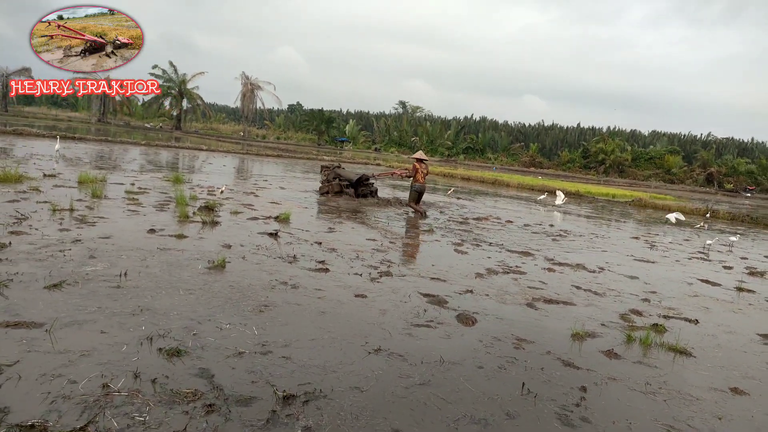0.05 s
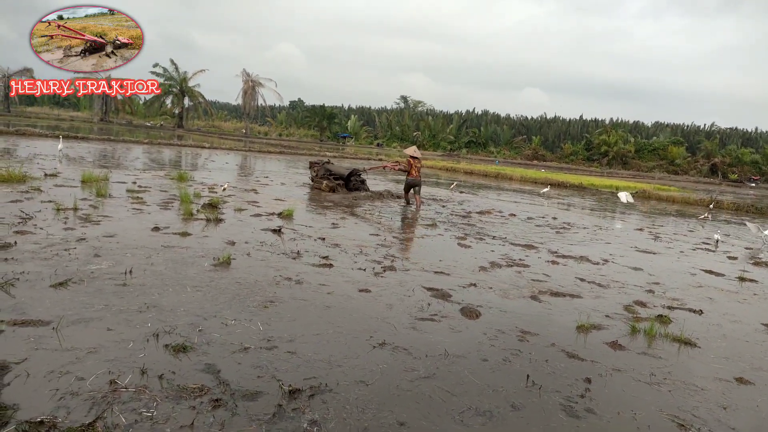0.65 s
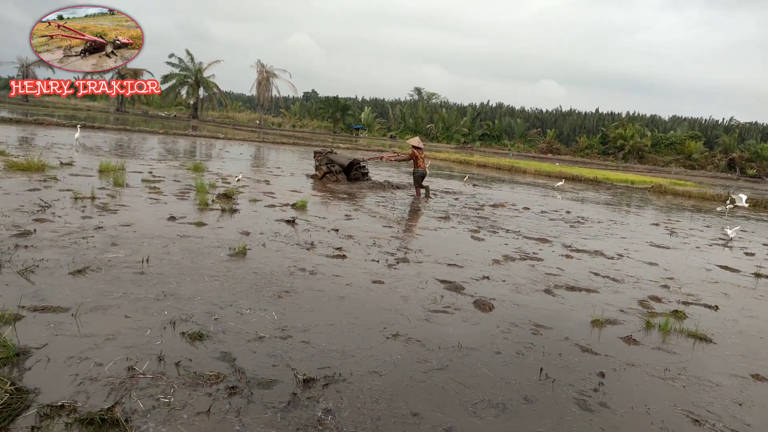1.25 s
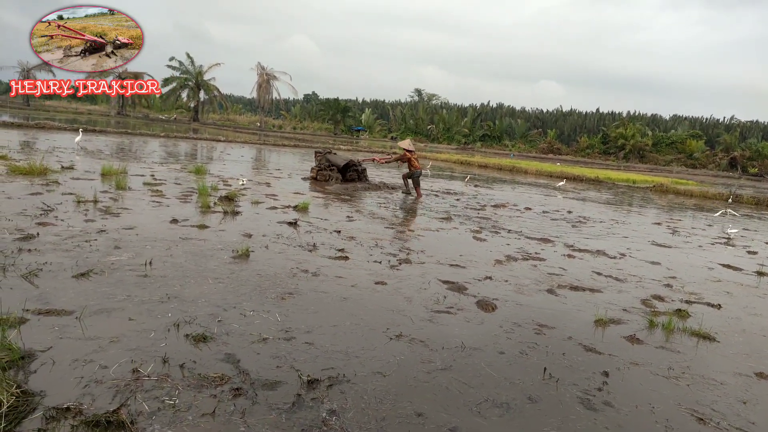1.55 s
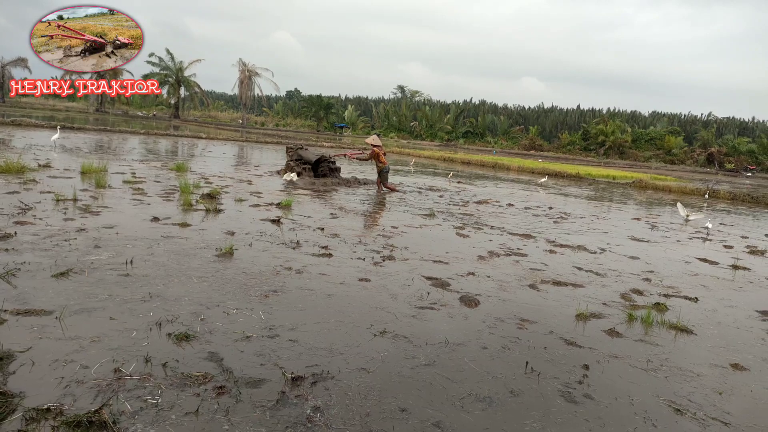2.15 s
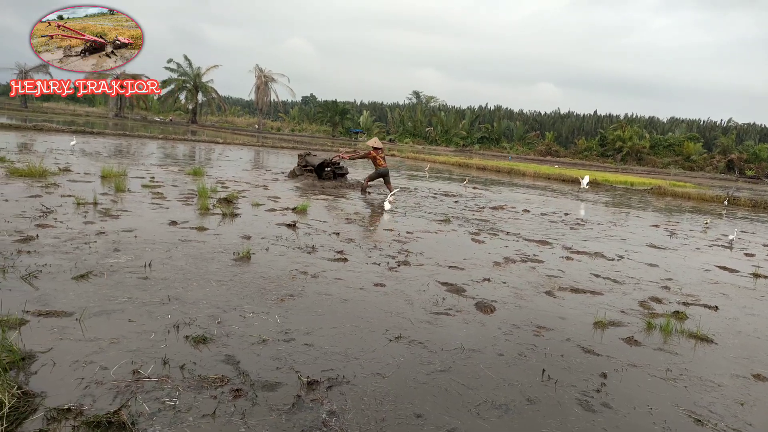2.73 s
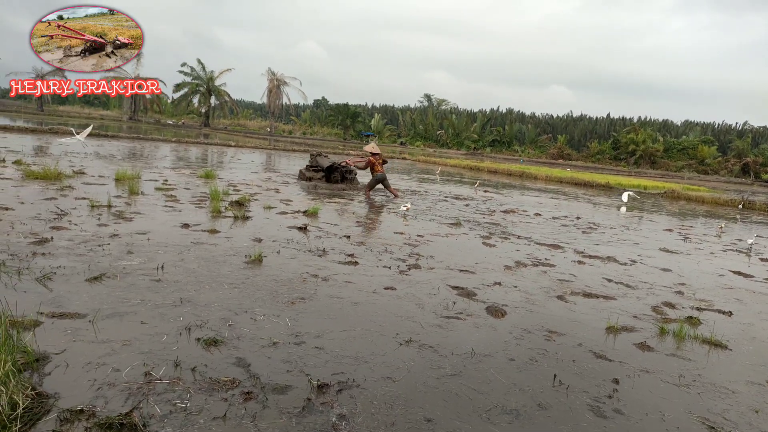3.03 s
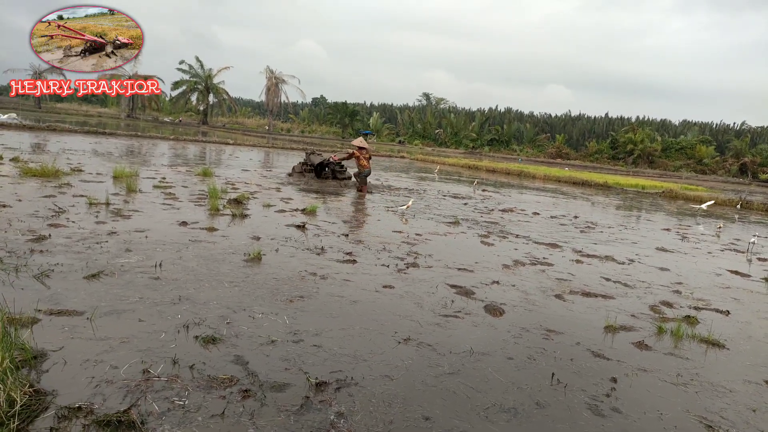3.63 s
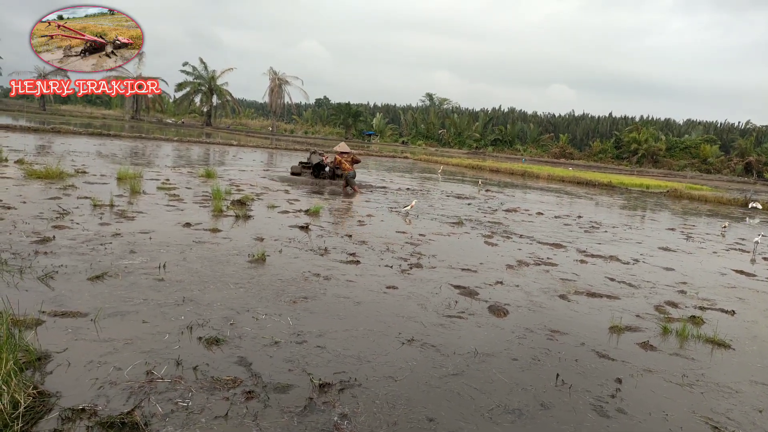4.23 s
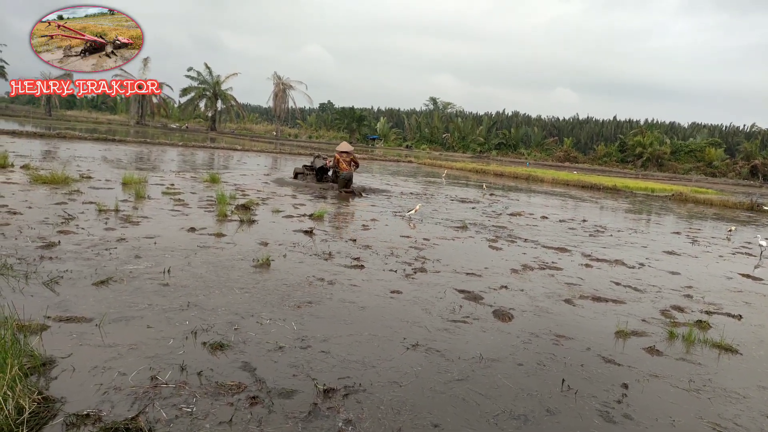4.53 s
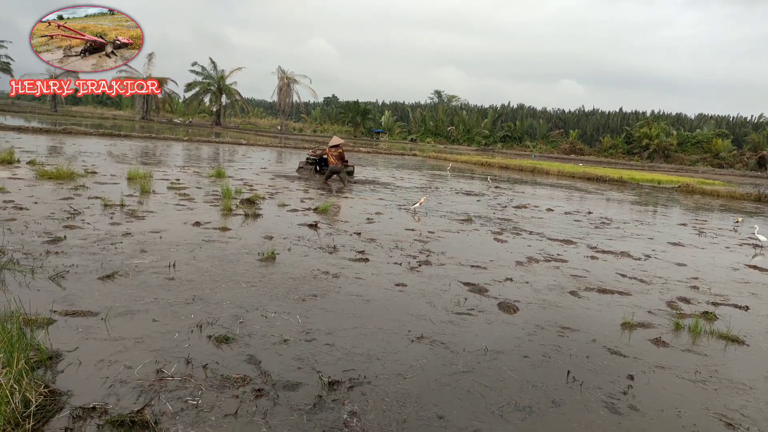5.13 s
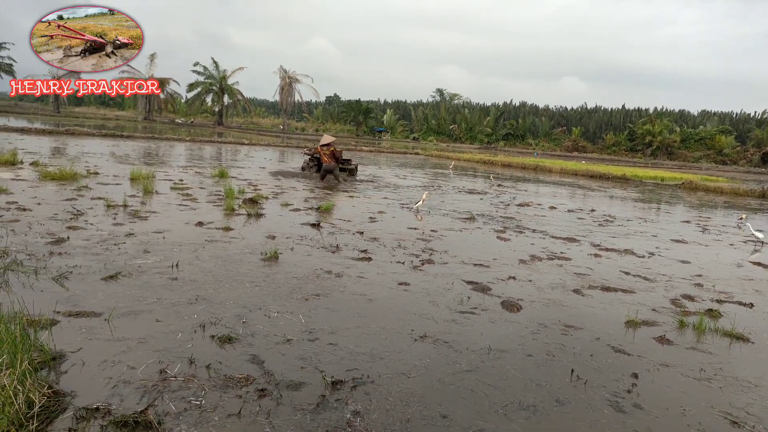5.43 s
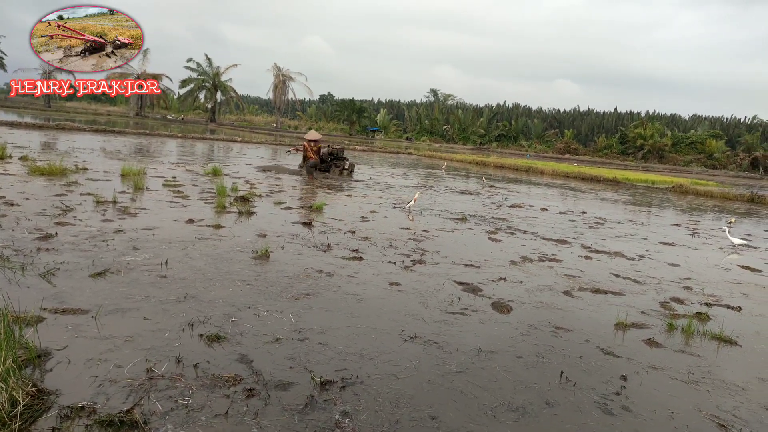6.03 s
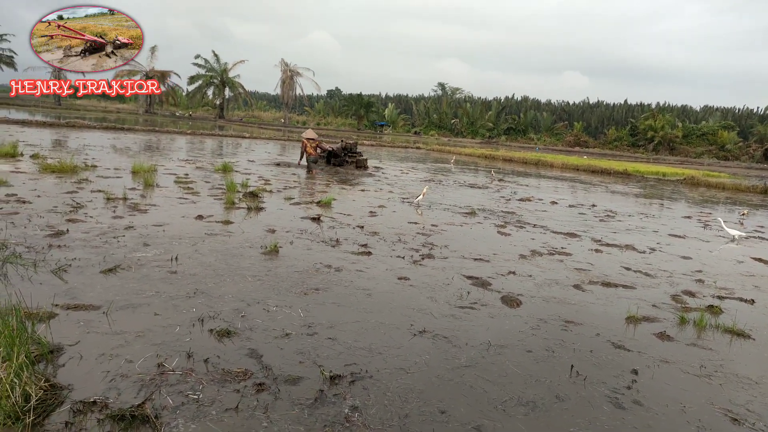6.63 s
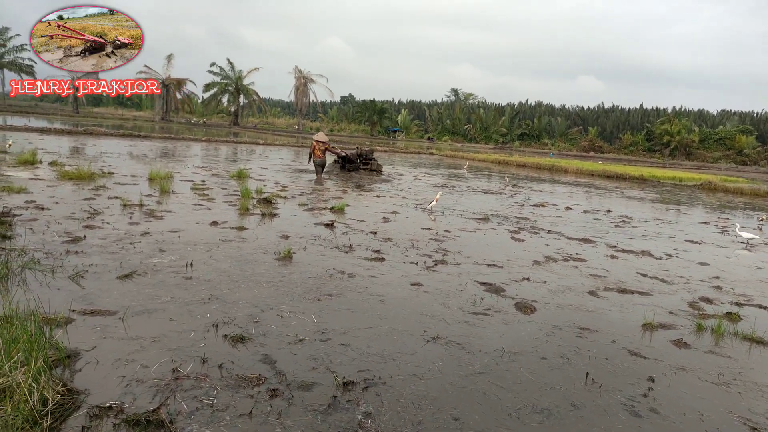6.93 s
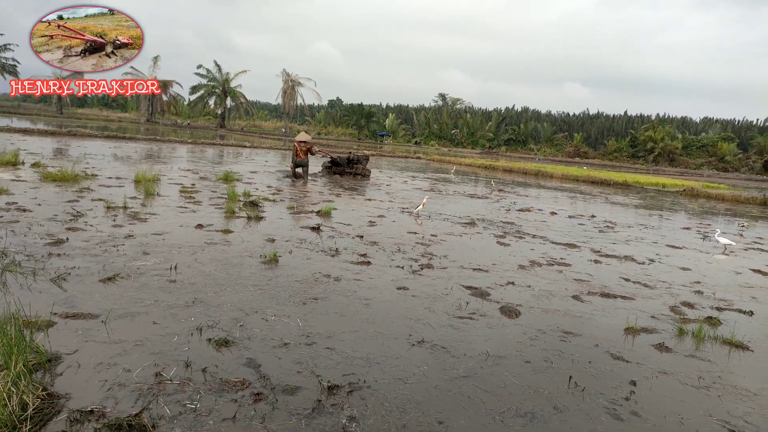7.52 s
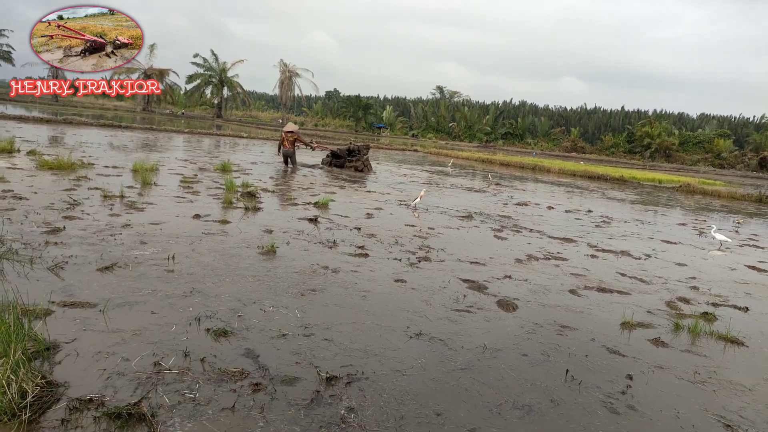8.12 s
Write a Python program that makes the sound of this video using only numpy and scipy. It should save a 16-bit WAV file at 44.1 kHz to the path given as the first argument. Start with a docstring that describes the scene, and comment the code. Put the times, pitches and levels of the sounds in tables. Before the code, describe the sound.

A walking tractor's single-cylinder diesel chugs steadily about twenty metres away in a flooded paddy field. Its frame thuds, rattles and clanks irregularly over ruts while the wheels churn mud and splash faintly. The tone shifts as it turns midway, and the knock then takes on a steelier edge. Light wind bumps the stereo microphone, and faint echoes return from the trees.

```python
"""A walking tractor's single-cylinder diesel chugs across a flooded paddy and turns round, some twenty
metres from a stereo microphone. Each four-stroke cycle gives an intake boom, a combustion knock, an
exhaust puff and a short gulp as the intake reopens. The frame clanks over the ruts, the belt squeaks
now and then, gears and cage wheels churn and splash. Faint echoes return from the banks and the tree
line, and light wind bumps the microphone."""
import sys
import numpy as np
from scipy import signal
from scipy.fft import rfft, irfft, next_fast_len
from scipy.io import wavfile

SR = 44100
rng = np.random.default_rng(int(sys.argv[2]) if len(sys.argv) > 2 else 0)


def persist_wave(psi):
    """Save psi, clipped to +-1, as 16-bit WAV."""
    counts = np.round(np.clip(psi, -1, 1) * 32767).astype(np.int16)
    wavfile.write(sys.argv[1], SR, np.atleast_2d(counts).T)


N = 369116
TIME = np.arange(N) / SR
FFT_SIZE = next_fast_len(N + 4096)
BINS_HZ = np.maximum(np.arange(FFT_SIZE // 2 + 1) * SR / FFT_SIZE, 1)

# how alike noise is at the microphone's two ports: f/Hz, likeness/0..1
PORT_LIKENESS = [(150, 0.87), (900, 1), (1250, 0.86), (1550, 0.3), (2500, 0.9), (6000, 0.44), (8000, 0.71),
                 (15000, 0.082)]
# balance of the ports: f/Hz, left minus right/dB
PORT_TILT = [(100, -1.5), (300, 2), (450, -3), (750, -2.5), (950, 1.5), (1250, -9), (1530, 0), (1800, -9.5),
             (2300, -2.5), (2900, -3.5), (3500, -2.5), (5000, 4), (6500, -2), (7800, -11.5), (11000, 0),
             (15000, -4.5)]
# how far the left port leads: f/Hz, phase/rad
PORT_LEAD = [(100, 0), (1100, 0), (1600, .25), (2200, 1.3), (3500, 2.1), (4500, 3.7), (6000, 6.4),
             (15000, 14)]
# breeze on the microphone: t/s, level/dB
BREEZE = [(0, -33), (1.6, -34), (2.2, -36.5), (2.8, -42.5), (3.95, -42), (5.1, -40.5), (5.7, -39.5),
          (8.37, -43)]
# buffets on top of it: t/s, level/dB, length/s
BUFFETS = [(0.167, -29, 0.054), (0.426, -29, 0.069), (0.63, -22, 0.033), (1.237, -30, 0.039),
           (4.19, -24.5, 0.064), (4.486, -19, 0.039), (4.74, -25, .064), (5.016, -35, 0.049),
           (5.164, -35, 0.027), (6.175, -23, 0.017), (7.097, -21.5, 0.023), (7.592, -34, 0.032),
           (7.88, -22.5, 0.013), (8.215, -32, 0.023)]

# the tractor's turn (0 crossing to the left, 90 driving away, 180 to the right): t/s, heading/deg
HEADING = [(0, 2.3), (1.2, 4.6), (2, 15), (3.6, 32), (4.7, 54), (5.55, 95), (6.1, 136), (6.7, 87),
           (8.37, 270)]
# the governor hunting around its set speed: t/s, firing rate/Hz
FIRING_RATE = [(0.0, 8.353), (0.23, 8.387), (0.71, 8.616), (1.2, 8.459), (1.62, 8.665), (2.37, 8.423),
               (2.89, 8.86), (3.5, 8.622), (4.17, 8.876), (4.73, 8.568), (5.29, 8.934), (5.93, 9.03),
               (6.32, 8.751), (6.81, 8.606), (7.79, 8.987), (8.08, 8.798), (8.37, 8.402)]
# how hard the wheels labour in the mud: t/s, level/dB
LABOUR = [(0, -31.5), (1.3, -33), (1.9, -33), (3.3, -33.5), (3.95, -30.5), (4.4, -38), (4.85, -32),
          (5.6, -34.5), (6.3, -35), (7, -30.5), (8.37, -36)]
# water thrown up by a cage wheel: t/s, level/dB, length/s
SPLASHES = [(2.441, -29, 0.052), (3.67, -34, 0.05)]
# belt squeaks and one low groan in the turn: t/s, f/Hz, level/dB, length/s
SQUEAKS = [(1.199, 6640, -34, 0.033), (2.41, 6760, -31.5, 0.029), (5.85, 693.5, -25.5, 0.017)]
# jolts in the ruts: t/s, f/Hz, thud level/dB, relative rattle level/dB, rattle t60/s
JOLTS = [(.218, 260, -22, -39, 0.19), (.634, 240, -21, -35, 0.18), (0.785, 262, -30, -26.5, .12),
         (1.247, 227, -8.5, -30, 0.093), (1.712, 284, -39, -32, 0.2), (2.424, 320, -19, -35, 0.32),
         (2.53, 280, -21, -27, 0.088), (2.866, 300, -12, -29, .039), (3.563, 275, -9, -26, 0.16),
         (4.05, 293, -14.5, -39.5, 0.55), (4.466, 274, -13, -49, .071), (4.822, 323, -6.5, -25, 0.15),
         (5.242, 296, -22, -31.5, 0.15), (5.803, 316, -11.5, -37.5, 0.48), (6.433, 294, -24, -25.5, 0.067),
         (6.488, 338, -14, -42, .05), (7.009, 370, -19, -29.5, 0.16), (7.062, 300, -29, -29, 0.09),
         (7.908, 297, -25, -31, 0.11), (8.338, 288, -10, -29, 0.29)]
# the loudest clanks of loose steel: t/s, level/dB, f/Hz
CLANKS = [(0.235, -19, 1980), (0.479, -17, 926), (0.714, -15, 921), (1.128, -18, 767), (1.251, -11, 993),
          (3.568, -16, 723), (3.934, -14, 785), (4.053, -13.5, 778), (4.079, -25, 1660),
          (4.827, -11.5, 711), (4.847, -18, 670), (5.211, -18, 865), (6.519, -24, 820), (6.678, -21, 830),
          (7.008, -11.5, 750), (7.793, -15.5, 1020), (7.91, -14, 736)]
# rocker taps as the valves open: place/cycle, level/dB, unevenness/dB
VALVE_TAPS = [(.503, -31.5, 3), (.752, -29.5, 3)]
# the hardest exhaust snaps, under load in the turn: t/s, level/dB
HARD_SNAPS = [(4.592, -37), (4.708, -37), (4.939, -31), (6.628, -31), (7.207, -30)]
# the knock's steely edge, strongest once the tractor has come round: t/s, level/dB
EDGE_LEVEL = [(0, -40), (3.4, -35), (4.45, -28), (4.8, -33), (5.42, -40), (5.8, -33), (5.92, -24),
              (6.27, -23), (6.95, -25), (7.42, -29), (7.85, -26), (8.19, -24.5), (8.37, -29)]

# noise spectra of wind, wheels and chassis: f/Hz, relative density/dB
WIND_SPECTRUM = [(15, 0.5), (35, 7), (70, 5.5), (120, 4), (200, -1), (400, -23)]
SPRAY_SPECTRUM = [(900, 14.5), (2000, 8), (3700, 4.5), (6500, -2.5), (8500, -6), (11000, -16), (15000, -38)]
CHURN_SPECTRUM = [(350, -5.5), (500, -7.5), (750, -0.5), (1000, -1), (1300, -9), (1900, -6.5), (2600, -15),
                  (3600, -9.5), (4500, -17.5), (6000, -24), (8500, -28.5), (12000, -44), (15000, -40)]
DRONE_SPECTRUM = [(165, 1), (190, 3.5), (230, 9), (310, 6.5), (380, -17), (500, -25)]
RATTLE_SPECTRUM = [(300, 6), (500, 6.5), (800, 6), (1200, 4.5), (1800, 9.5), (2600, 0.5), (4000, -0.5),
                   (7000, -7.5), (11000, -20), (15000, -46)]
# noise spectra of the exhaust (puff, trail) and the knock: f/Hz, relative density/dB
PUFF_SPECTRUM = [(350, 6.5), (500, -0.5), (850, 0), (1300, 3), (1700, -18), (2400, 2.5), (2950, -11),
                 (3600, 4.5), (4150, 1), (4600, -7.5), (6500, -4.5), (8500, -9), (10500, -14), (12500, -29),
                 (15000, -21.5)]
TRAIL_SPECTRUM = [(900, -27), (1700, -21), (2600, 11.5), (3600, 16), (4500, -2), (6500, -28), (10000, -6.5),
                  (15000, -40)]
CRACK_SPECTRUM = [(400, 7), (550, -21), (800, 11), (1050, -17), (1250, -50), (1600, 6), (2200, -4.5),
                  (3500, -6.5), (4500, -10.5), (6500, -28), (9000, -30), (12000, -44), (15000, -52)]
CLACK_SPECTRUM = [(700, 8), (1050, 22), (1800, 9), (3000, -42), (4500, -22), (7000, -16), (10000, -54),
                  (15000, -57)]
EDGE_SPECTRUM = [(1000, -4), (1700, 1), (2200, -5), (3050, 1), (3450, -2), (4000, 3), (4600, -2),
                 (5500, -9), (7500, -18), (11000, -29), (15000, -38)]

# modes of the hollow frame and of loose steel: ratio to the note, level/dB, t60/s
FRAME_MODES = [(.83, 0.5, 0.028), (1, 0, 0.081), (1.19, -10, 0.096), (2.15, -20, 0.086)]
STEEL_MODES = [(1, -4, 0.056), (1.29, -8, 0.037), (1.83, -9, 0.042), (2.7, -12, 0.024), (4.1, -18, .015)]
# modes of loose tin, rocker cover, air pipe, air cleaner and silencer: f/Hz, level/dB, t60/s
TIN_MODES = [(720, -2.5, 0.08), (838, -2, 0.031), (1020, -5.5, 0.029), (1458, 4, 0.055), (1660, 4, 0.022),
             (1968, 0.5, 0.03), (2386, 6.5, 0.04), (2830, 0, 0.028), (3560, -3, 0.024), (3905, 6, 0.045),
             (5170, -3.5, 0.022), (5870, -4, 0.03), (6860, -4, 0.018), (7380, -1, 0.02)]
ROCKER_MODES = [(745, -2, .035), (960, -2, .03), (1400, -1, .04), (1680, -2, .03), (2080, -4, .025),
                (2650, -6, .02)]
PIPE_SHUT_MODES = [(175.4, -16, 0.18), (189, -27, 0.041)]
PIPE_OPEN_MODES = [(198.3, -11, 0.03), (265.3, -32, 0.093)]
AIR_CLEANER_MODES = [(268.4, -8, 0.18), (311.9, 1.5, 0.38)]
SILENCER_MODES = [(92, 4.23, 0.053), (222, 3.2, 0.054)]

# four angles on the engine block: heading/deg
BLOCK_HEADINGS = (0, 26, 70, 130)
# modes of the block and its tin cover: f/Hz, t60/s, level/dB at each of those headings
BLOCK_MODES = [(780, .036, (-26, -31, -42, -40)), (835, .03, (-36, -32, -34, -34.5)),
               (942, 0.038, (-42, -37, -36, -22.5)), (1020, 0.046, (-42, -26.5, -30.5, -37)),
               (1469, 0.026, (-27, -28, -33, -39)), (1528, 0.037, (-21, -25, -36, -35)),
               (1537, 0.053, (-16, -70, -36, -63)), (1817, 0.036, (-58, -55, -37, -30)),
               (1854, 0.03, (-35, -67, -39, -43))]
# piston slap against the firing blow: level/dB at each of those headings
SLAP_DB = (-12, 1.5, 3.5, 0)
# how each sound carries to the microphone: relative level/dB at headings 0, 90 and 180
TIN_DB = (-17, -27.5, -17)
HUM_DB = (-36.5, -29, -34.5)
THUMP_DB = (-18.5, -25.5, -25.5)
HISS_DB = (-24.5, -34.5, -29.5)
TRAIL_DB = (-27, -71, -42.5)
CRACK_DB = (-23, -38, -28.5)
CLACK_DB = (-40, -29.5, -36.5)


def from_db(db):
    """Decibels to gain."""
    return 10 ** (np.asarray(db) / 20)


def butter(x, order, hz, kind):
    """Butterworth filter."""
    return signal.sosfilt(signal.butter(order, hz, kind, fs=SR, output="sos"), x)


def in_time(curve):
    """A curve over time, at every sample."""
    return np.interp(TIME, *np.transpose(curve))


def per_bin(curve):
    """A curve over log frequency, at every FFT bin."""
    hz, value = np.transpose(curve)
    return np.interp(np.log(BINS_HZ), np.log(hz), value)


def drift(rate_hz):
    """A random wander of spread 1."""
    knots = rng.standard_normal(8192)
    return np.interp(TIME * rate_hz, np.arange(len(knots)), knots) * np.sqrt(3 / 2)


def noise(spectrum, likeness=PORT_LIKENESS):
    """Stereo noise of unit rms, falling steeply beyond both ends of its spectrum."""
    mid, side = rfft(rng.standard_normal((2, FFT_SIZE)))
    alike = np.clip(per_bin(likeness), 0, 1)
    pair = np.sqrt(1 + alike) * mid + np.sqrt(1 - alike) * side * [[1], [-1]]
    skirts = np.minimum(BINS_HZ / spectrum[0][0], spectrum[-1][0] / BINS_HZ).clip(max=1) ** 4
    x = irfft(from_db(per_bin(spectrum)) * skirts * pair, FFT_SIZE)[:, :N]
    return x / np.sqrt(np.mean(x ** 2) + 1e-20)


def ring(clicks, hz, t60):
    """A unit click sets a sine of height 1 ringing."""
    radius, angle = from_db(-60 / (t60 * SR)), 2 * np.pi * hz / SR
    return signal.lfilter([0, np.sin(angle)], [1, -2 * radius * np.cos(angle), radius ** 2],
                          clicks + 1e-18)


def body(clicks, modes):
    """All modes of a body, driven by the same blows."""
    return sum(from_db(db) * ring(clicks, hz, t60) for hz, db, t60 in modes)


def struck(s, hz, modes, rise_s):
    """One blow on a body whose modes are multiples of a note."""
    at = int(s * SR)
    age = TIME[:min(N - at, SR // 3)]
    rings = sum(from_db(db - 60 * age / t60) * np.sin(2 * np.pi * hz * ratio * age)
                for ratio, db, t60 in modes)
    attack = 1 - np.exp(-(age / rise_s) ** 2)
    return np.pad(rings * attack, (at, N - at - len(age)))


def strokes(cycles, place, spread_db, jitter_s):
    """One click per engine cycle at a place in it (0..1), a little uneven in strength and time."""
    timing, strength = rng.standard_normal((int(cycles[-1]) + 2, 2)).T
    when = np.interp(np.arange(len(timing)) + place, cycles, TIME, left=-1, right=-1) + jitter_s * timing
    heard = (when > 0) & (when < TIME[-1])
    clicks = np.zeros(N)
    clicks[(when[heard] * SR).astype(int)] = from_db(spread_db * strength[heard])
    return clicks


def burst(clicks, rise_s, t60):
    """Each click becomes an envelope that swells to the click's height and dies away."""
    age = TIME[:SR // 4]
    shape = (1 - np.exp(-(age / rise_s) ** 2)) * from_db(-60 * age / t60)
    return signal.fftconvolve(clicks, shape / shape.max())[:N]


def swell(centre_s, length_s):
    """A bell-shaped envelope."""
    return np.exp(-2 * np.minimum(((TIME - centre_s) / length_s) ** 2, 20))


def facing(heading, side_db):
    """Gain of a part as it turns towards or away from the microphone; held beyond 180 degrees."""
    return from_db(np.interp(heading, [0, 90, 180], side_db))


def wind(right_over_left_db=9.5):
    """Wind on the microphone: a lumpy low rumble, mostly separate at each port."""
    breeze = from_db(in_time(BREEZE) + 1.5 * drift(14))
    buffets = sum(from_db(db) * swell(s, length) for s, db, length in BUFFETS)
    pan = from_db(right_over_left_db / 2 * np.array([[-1], [1]]))
    return (breeze + buffets) * pan * noise(WIND_SPECTRUM, likeness=[(20, 0.13), (400, 0.56)])


def field_echoes(x):
    """Dull echoes come back from the banks and the tree line, different at each side."""
    dull = butter(x, 1, 2500, "low")
    lags = (rng.uniform(0.0099, 0.33, (2, 8)) * SR).astype(int)
    return np.array([sum(np.pad(side, (lag, 0))[:N] for lag in own) for side, own in zip(dull, lags)])


def water(spray_db=-46.5):
    """The cage wheels keep up a fine spray and now and then a soft splash."""
    level = from_db(spray_db) + sum(from_db(db) * swell(s, length) for s, db, length in SPLASHES)
    return level * from_db(2 * drift(300)) * noise(SPRAY_SPECTRUM)


def churning(labour):
    """Gears and cage wheels clatter unevenly in the mud; the chassis drones faintly."""
    uneven = from_db(1.78 * drift(60) + 2 * drift(350))
    return labour * uneven * noise(CHURN_SPECTRUM) + from_db(-35.5) * noise(DRONE_SPECTRUM)


def belt():
    """The belt slips briefly with a thin, unsteady note."""
    wavering_time = np.cumsum(1 + 0.0085 * drift(210)) / SR
    return np.sqrt(2) * sum(from_db(db) * swell(s, length) * np.sin(2 * np.pi * hz * wavering_time)
                            for s, hz, db, length in SQUEAKS)


def jolts():
    """A wheel drops into a rut: the frame rings hollowly and its loose parts rattle."""
    thuds, shake = np.zeros(N), np.zeros(N)
    for s, hz, thud_db, rattle_db, t60 in JOLTS:
        thuds += from_db(thud_db) * struck(s, hz, FRAME_MODES, rise_s=0.0058)
        at = int(s * SR)
        age = TIME[:min(N - at, SR // 3)]
        attack = 1 - np.exp(-age / 0.0017)
        shake[at:at + len(age)] += attack * from_db(rattle_db + 7 - 60 * age / t60)
    return thuds + shake * from_db(0.93 * drift(840)) * noise(RATTLE_SPECTRUM)


def clanks():
    """Single hard knocks of steel on steel, each with a brief ring."""
    return sum(from_db(db) * struck(s, hz, STEEL_MODES, rise_s=0.00043) for s, db, hz in CLANKS)


def tinwork(cycles, labour, heading, clacks_per_s=55, parts=4, max_detune=0.0763):
    """Loose parts, tuned slightly apart, clack at random, hardest as the exhaust and intake open."""
    exhaust_kicks = strokes(cycles, place=0.49, spread_db=0.5, jitter_s=0.00067)
    intake_kicks = strokes(cycles, place=0.73, spread_db=2, jitter_s=0.0013)
    shake = (0.38 + 1.1 * burst(exhaust_kicks, rise_s=0.0024, t60=0.17)
             + 0.5 * burst(intake_kicks, rise_s=0.003, t60=0.2))
    at = np.flatnonzero(rng.random(N) < clacks_per_s / SR)
    force = (facing(heading, TIN_DB) * labour ** 0.54 * shake)[at]
    part_hit = rng.integers(0, parts, len(at))
    rings = np.zeros(N)
    for hz, db, t60 in TIN_MODES:
        mode_force = force * rng.uniform(-0.86, 1, len(at)) * np.sqrt(3)
        for part, detune in enumerate(np.linspace(-max_detune, max_detune, parts)):
            clicks = np.bincount(at, mode_force * (part_hit == part), N)
            rings += from_db(db) * ring(clicks, hz * (1 + detune), t60)
    return butter(rings, 2, [600, 9000], "band")


def valve_gear(cycles):
    """A rocker clacks as each valve opens, ringing the cover a little differently each time."""
    taps = sum(from_db(db) * strokes(cycles, place, spread_db, jitter_s=0.0005)
               for place, db, spread_db in VALVE_TAPS)
    rings = sum((-1) ** k * from_db(db) * ring(taps * from_db(2 * drift(20)), hz, t60)
                for k, (hz, db, t60) in enumerate(ROCKER_MODES))
    return butter(rings, 2, 600, "high")


def intake(cycles, heading):
    """The valve shuts: the air pipe booms and the air cleaner hums. It reopens with a short gulp."""
    shutting = -strokes(cycles, place=0.0062, spread_db=1, jitter_s=0.0001)
    opening = -strokes(cycles, place=0.751, spread_db=0.7, jitter_s=0.00025)
    boom = body(shutting, PIPE_SHUT_MODES)
    hum = body(shutting, AIR_CLEANER_MODES) * facing(heading, HUM_DB)
    gulp = body(opening, PIPE_OPEN_MODES)
    return butter(boom + hum + gulp, 3, [148, 420], "band")


def exhaust(cycles, heading):
    """A slug of gas thumps the silencer, snaps at the outlet amid hiss and trails off duller."""
    slugs = -strokes(cycles, place=0.481, spread_db=2.5, jitter_s=0.00038) * facing(heading, THUMP_DB)
    thump = butter(body(slugs, SILENCER_MODES), 2, [38, 300], "band")
    opening = strokes(cycles, place=0.471, spread_db=1.5, jitter_s=0.0002)
    hard_snaps = np.zeros(N)
    for s, db in HARD_SNAPS:
        hard_snaps[int(s * SR)] = from_db(db)
    outlet_gain = facing(heading, HISS_DB)
    snap = burst(0.68 * opening * outlet_gain + hard_snaps, rise_s=0.0025, t60=0.036)
    jet = burst(strokes(cycles, place=0.33, spread_db=2, jitter_s=0.0026), rise_s=0.026, t60=0.087)
    puff = (snap + 0.5 * jet * outlet_gain) * noise(PUFF_SPECTRUM)
    trail = burst(opening, rise_s=0.0077, t60=0.18) * facing(heading, TRAIL_DB) * noise(TRAIL_SPECTRUM)
    return thump + (puff + trail) * from_db(2 * drift(700))


def block_knock(cycles, heading, slap_lag_s=0.0039):
    """Ignition and piston slap ring the block and its cover, which bounces once."""
    fire = strokes(cycles, place=0.25, spread_db=0.7, jitter_s=0.0003)
    slap_gain = from_db(np.interp(heading, BLOCK_HEADINGS, SLAP_DB))
    slap = slap_gain * np.pad(fire, (round(slap_lag_s * SR), 0))[:N]
    bounce = strokes(cycles, place=0.318, spread_db=2, jitter_s=0.002)
    blows = fire + slap + 0.45 * bounce
    rings = np.zeros(N)
    for hz, t60, side_db in BLOCK_MODES:
        towards_mic = from_db(np.interp(heading, BLOCK_HEADINGS, side_db))
        rings += towards_mic * ring(blows * from_db(1.2 * drift(14)), hz, t60)
    return butter(rings, 2, [600, 3000], "band")


def combustion_crack(cycles, heading):
    """The noisy part of the knock: each firing cracks and clacks briefly, with a steely edge."""
    crack = burst(strokes(cycles, place=0.225, spread_db=0.7, jitter_s=0.0014), rise_s=0.0024, t60=0.12)
    clack = burst(strokes(cycles, place=0.235, spread_db=0.7, jitter_s=0.0003), rise_s=0.0009, t60=0.08)
    edge = burst(strokes(cycles, place=0.25, spread_db=0.7, jitter_s=0.0003), rise_s=0.0011, t60=0.034)
    return (crack * facing(heading, CRACK_DB) * noise(CRACK_SPECTRUM)
            + clack * facing(heading, CLACK_DB) * noise(CLACK_SPECTRUM)
            + edge * from_db(in_time(EDGE_LEVEL)) * noise(EDGE_SPECTRUM))


def scene():
    """Out on the paddy: one cycle count times the engine; the heading sets what faces the microphone."""
    cycles = np.cumsum(in_time(FIRING_RATE)) / SR - 0.0881
    heading = in_time(HEADING)
    labour = from_db(in_time(LABOUR) + 2 * drift(5))
    knock = block_knock(cycles, heading) + combustion_crack(cycles, heading)
    bright = knock + valve_gear(cycles) + jolts() + clanks() + belt() + tinwork(cycles, labour, heading)
    tractor = intake(cycles, heading) + exhaust(cycles, heading) + churning(labour) + water() + bright
    return tractor + from_db(-28.5) * field_echoes(bright) + wind()


def record(dry, cutoff_hz=15800):
    """The microphone's two ports colour and delay the sound differently; the top is cut."""
    tilt, lead = from_db(per_bin(PORT_TILT)), per_bin(PORT_LEAD)
    ports = np.array([tilt, np.exp(-1j * lead)]) * np.sqrt(2 / (1 + tilt ** 2))
    heard = irfft(rfft(dry, FFT_SIZE) * ports, FFT_SIZE)[:, :N]
    return signal.sosfilt(signal.ellip(10, 0.1, 80, cutoff_hz, fs=SR, output="sos"), heard)


dry = scene()
out = record(dry)
persist_wave(out)
```